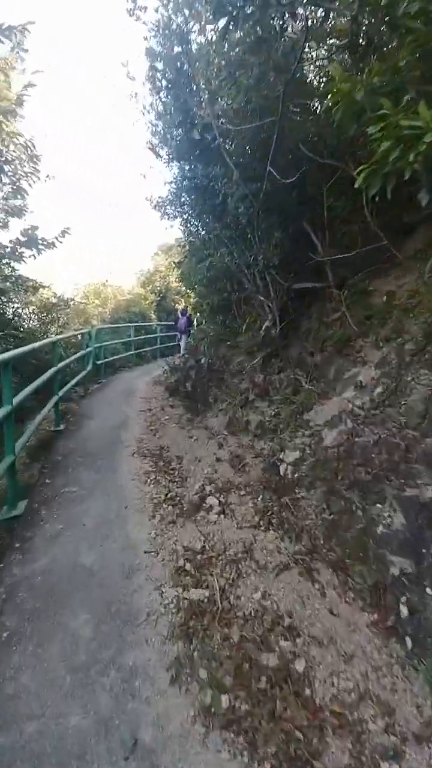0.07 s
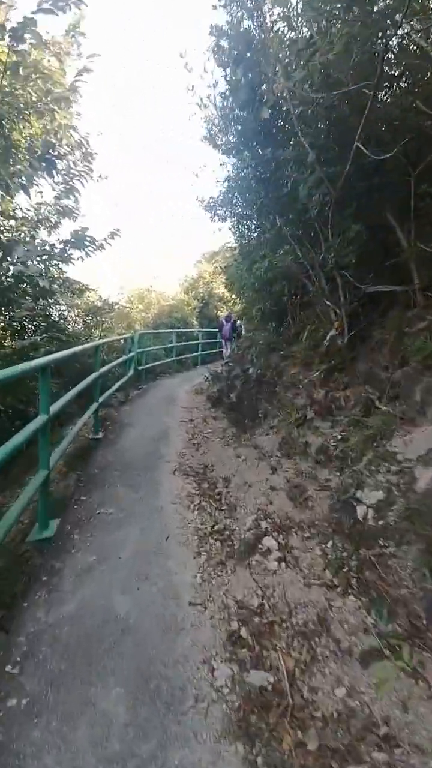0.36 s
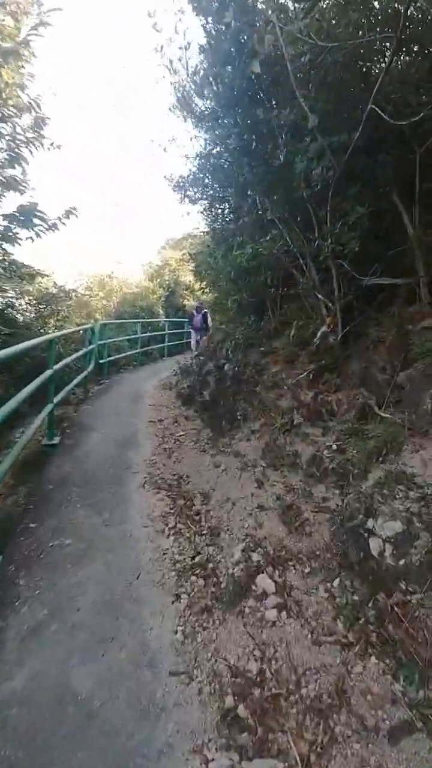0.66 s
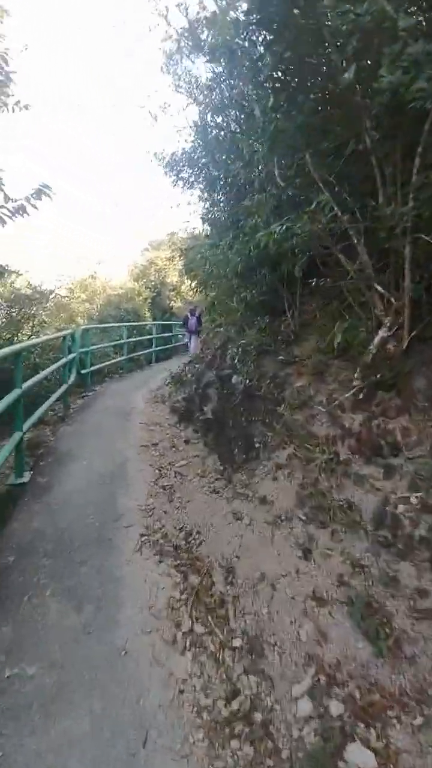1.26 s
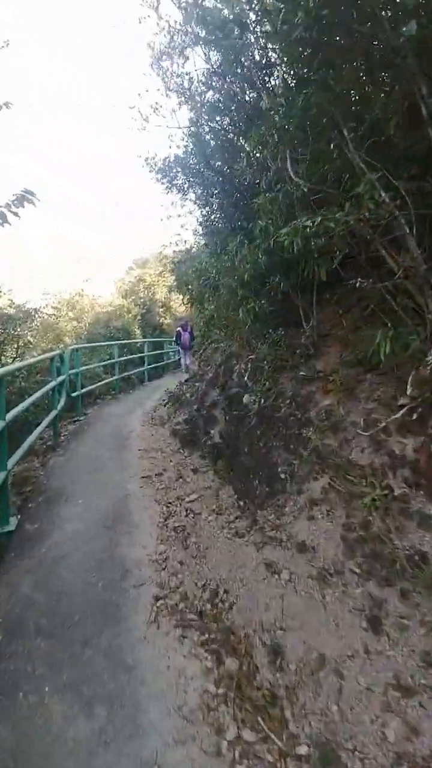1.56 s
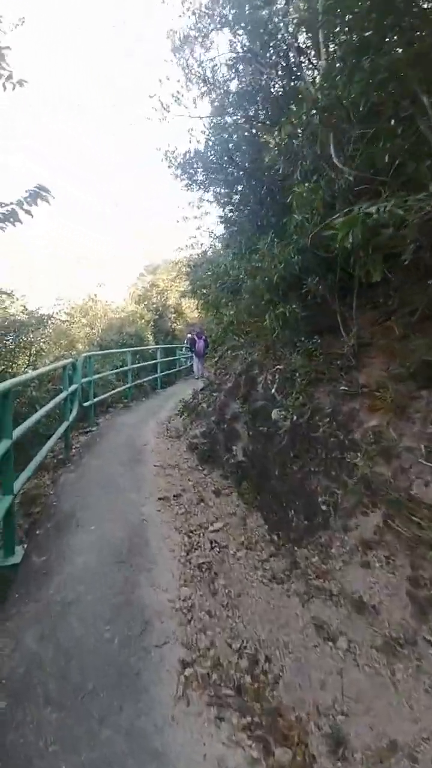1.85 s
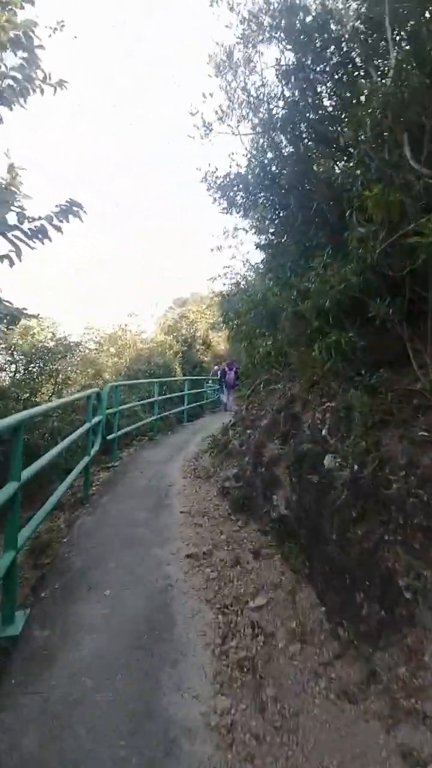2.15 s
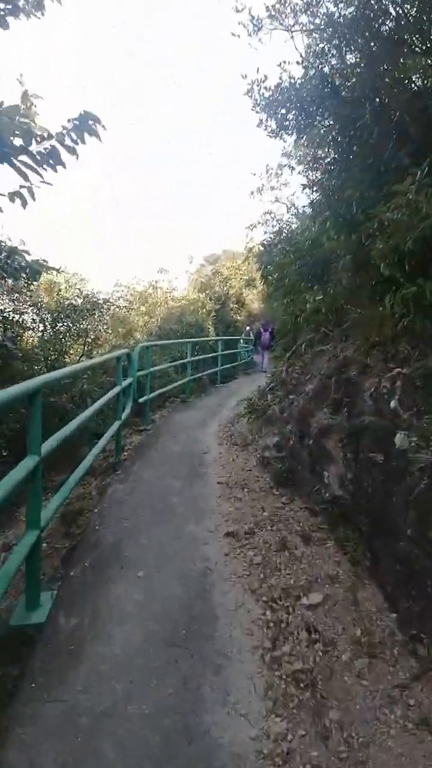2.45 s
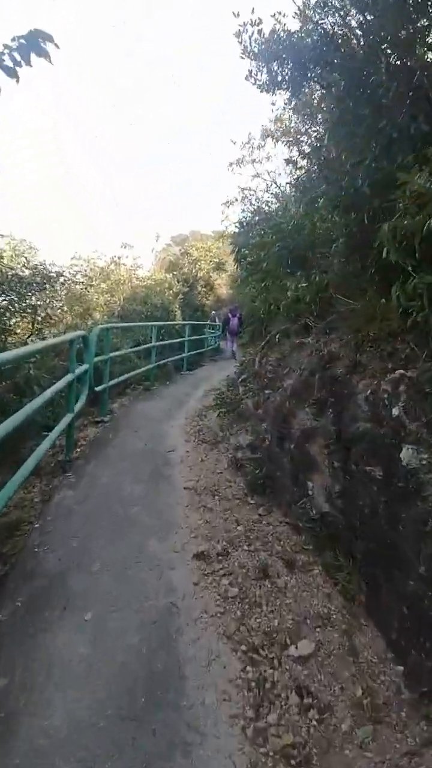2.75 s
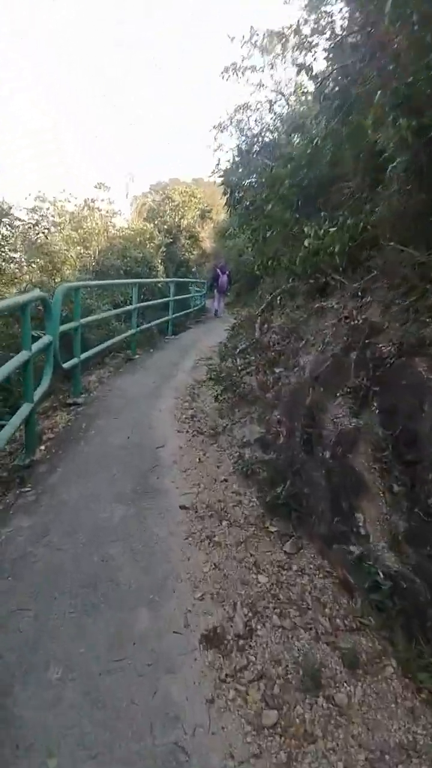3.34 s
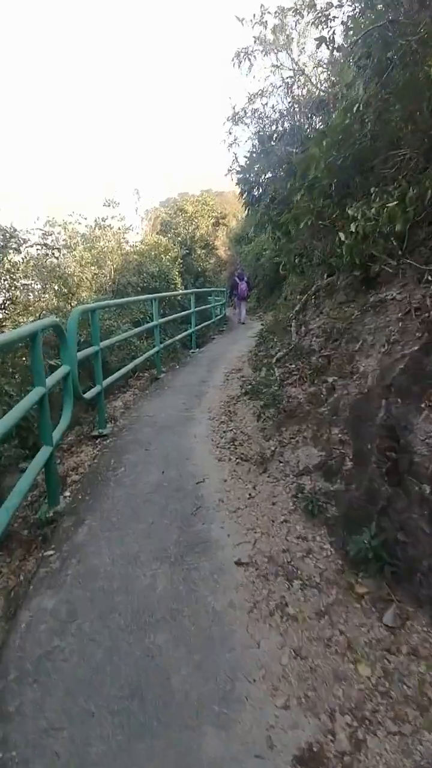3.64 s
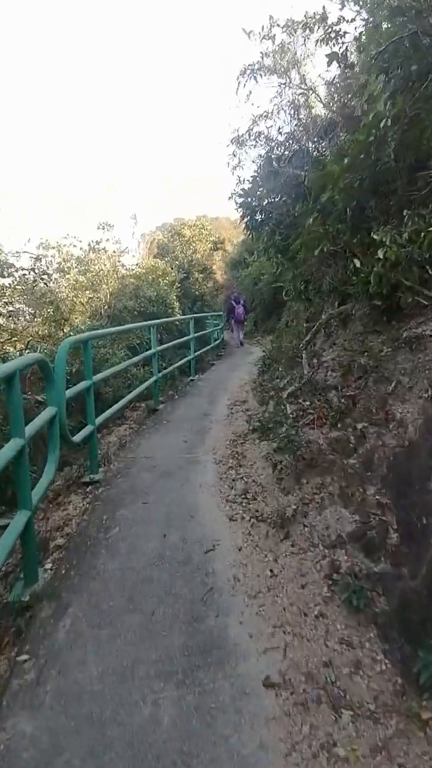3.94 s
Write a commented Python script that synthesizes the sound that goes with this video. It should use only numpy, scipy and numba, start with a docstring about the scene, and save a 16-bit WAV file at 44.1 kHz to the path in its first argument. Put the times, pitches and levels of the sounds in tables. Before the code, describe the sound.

Wind rumbles on the microphone in uneven gusts along a hillside path, growing stronger halfway through. Carried gear clicks and ticks close by, mostly on the right, and leaves hiss faintly, with soft shoe scuffs near the end.

```python
"""Paved hillside path, on a walk. Gusts buffet the left and right microphone ports in turn.
Carried gear knocks, rattles and ticks close by, mostly on the right: a plastic body and small
hard parts ring briefly. Soles scuff softly on grit; something rubs with one faint squeak.
Open air and hissing foliage lie all round."""
import sys
import numpy as np
from scipy import signal
from scipy.fft import rfft, irfft
from scipy.io import wavfile
from numba import njit

SR = 44100
rng = np.random.default_rng(int(sys.argv[2]) if len(sys.argv) > 2 else 0)


def materialize(psi):
    """Save the field psi as 16-bit PCM at rate SR to the path in sys.argv[1].

    A 1-D psi becomes a single channel; in a 2-D psi each row is a channel.
    """
    bounded = np.clip(np.atleast_2d(psi).T, -1, 1)
    quanta = np.round(bounded * 32767).astype(np.int16)
    wavfile.write(sys.argv[1], SR, quanta)


N = 176400
T = np.arange(N) / SR
RUB_ATTACK_S, RUB_RELEASE_S = .0055, .0047


def amp(db):
    """Decibels to gain."""
    return 10 ** (np.asarray(db) / 20)


def unit(x):
    """Scale to rms 1."""
    return x / np.sqrt(np.mean(x ** 2) + 1e-18)


def noise(spectrum, white=None):
    """Noise of rms 1, shaped by (f/Hz, level/dB) points."""
    hz, db = np.array(spectrum).T
    f = np.maximum(np.arange(N // 2 + 1) * SR / N, 1)
    white = rng.standard_normal(N) if white is None else white
    gain = amp(np.interp(np.log(f), np.log(hz), db))
    return unit(irfft(rfft(white) * gain, N))


def wander(rate_hz):
    """Smooth random signal of rms 1, bandwidth about rate_hz."""
    f = np.arange(N // 2 + 1) * SR / N
    return unit(irfft(rfft(rng.standard_normal(N)) * np.exp(-(f / rate_hz) ** 2), N))


def swell(start_s, length_s, attack_s, release_s):
    """Envelope: exponential rise up to start_s, hold, decay."""
    rise = np.minimum(T - start_s, 0) / attack_s
    fall = np.maximum(T - start_s - length_s, 0) / release_s
    return np.exp(np.maximum(rise - fall, -20))


def pan(db):
    """Constant-power gains for an L-R level difference."""
    gains = amp([[db / 2], [-db / 2]])
    return gains / np.sqrt(np.sum(gains ** 2))


def ports(x, lag_s=.00054):
    """Sound from the right reaches the left port late."""
    return np.array([np.roll(x, int(lag_s * SR)), x])


def ring(t, hz, t60_s, rise_s):
    """One struck mode."""
    return np.sin(2 * np.pi * hz * t) * np.exp(-np.log(1000) * t / t60_s) * (1 - np.exp(-t / rise_s))


@njit
def lowpass(x, hz):
    """Two-pole low-pass with a moving corner."""
    y, band_state, low_state = np.empty(len(x)), 0., 0.
    for i in range(len(x)):
        g = np.tan(np.pi * hz[i] / SR)
        band = (band_state + g * (x[i] - low_state)) / (1 + g * (g + 1.3))
        y[i] = low_state + g * band
        band_state, low_state = 2 * band - band_state, 2 * y[i] - low_state
    return y


def buffet(gusts, spectrum, breeze_db, breeze_hz):
    """Turbulence on one port: eddies shake each gust; a stronger push reaches higher."""
    wake_db, wake_s, wake_hz = -17, .22, 147  # broader, deeper swell round each gust
    eddy_db, reach_exponent = 2.5, .33
    power = np.full(N, amp(breeze_db) ** 2)
    weighted_hz = power * breeze_hz
    for start_s, length_s, db, reach_hz in gusts:
        env = swell(start_s, length_s, attack_s=.012, release_s=.024)
        push = (amp(db) * env) ** 2
        wake = (amp(db + wake_db) * swell(start_s, length_s, wake_s, wake_s)) ** 2
        power += push + wake
        weighted_hz += push * reach_hz * env ** reach_exponent + wake * wake_hz
    eddies = amp(eddy_db * wander(rate_hz=72.5))
    corner_hz = np.clip(weighted_hz / power * eddies ** reach_exponent, 40, 3000)
    rumble = noise(spectrum)
    for _ in range(3):
        rumble = lowpass(rumble, corner_hz)
    return rumble * np.sqrt(power) * unit(eddies)


def wind():
    """Each port rumbles with its own gusts over a steady breeze."""
    # gusts: t/s, length/s, relative level/dB, upper reach/Hz
    gusts_left = [(0, 0.22, -34, 207), (.46, 0.29, -38, 174), (1.03, 0.084, -38, 205),
                  (1.37, 0.042, -30, 230), (1.54, 0.28, -33, 206), (1.89, 0.24, -28, 284),
                  (2.08, 0.035, -21, 398), (2.123, 0.0087, -21, 510), (2.19, 0.062, -26, 366),
                  (2.35, 0.074, -25, 316), (2.522, 0.008, -21, 400), (2.544, 0.0054, -20.5, 600),
                  (2.565, 0.038, -30, 300), (2.645, 0.037, -20.5, 492), (2.7, 0.028, -22.5, 322),
                  (2.758, 0.0074, -20.5, 370), (2.795, .012, -20, 262), (2.85, .02, -21.5, 334),
                  (2.895, 0.028, -26.5, 348), (3.0, 0.049, -28, 282), (3.085, 0.017, -22, 229),
                  (3.19, 0.038, -28.5, 312), (3.275, 0.024, -23, 510), (3.63, 0.054, -33.5, 222),
                  (3.74, 0.096, -33, 233)]
    gusts_right = [(0.071, 0.014, -27, 235), (.12, 0.037, -30.5, 446), (.18, 0.06, -27.5, 270),
                   (.26, 0.1, -31, 277), (.48, 0.053, -29, 318), (.64, 0.018, -27, 302),
                   (.76, 0.066, -31.5, 282), (.95, 0.061, -35.5, 250), (1.145, 0.056, -32, 303),
                   (1.216, 0.01, -22.5, 453), (1.245, 0.033, -26.5, 577), (1.285, 0.012, -24, 244),
                   (1.31, 0.056, -30, 300), (1.55, 0.22, -38.5, 191), (2.31, 0.24, -32.5, 215),
                   (2.52, 0.15, -31.5, 313), (2.619, 0.13, -29, 332), (2.856, 0.025, -28.5, 308),
                   (2.935, 0.041, -26, 493), (3.039, 0.079, -26.5, 202), (3.209, 0.011, -30.5, 754),
                   (3.26, 0.037, -31, 447), (3.328, 0.041, -21.5, 620), (3.368, 0.032, -25.5, 1030),
                   (3.41, 0.05, -36, 530), (3.695, 0.0055, -22, 327), (3.725, 0.071, -30, 530),
                   (3.829, 0.049, -23, 335), (3.963, 0.049, -25.5, 262)]
    # turbulence spectra ahead of the low-pass: f/Hz, relative level/dB
    spectrum_left = [(15, -28), (35, 2.5), (70, 2.5), (140, 3.5), (250, -2.5), (450, -7), (900, -5),
                     (3000, -18)]
    spectrum_right = [(15, -22), (35, 1.5), (70, 4.5), (150, -0.5), (250, -1.5), (380, -3.5), (480, -3.5),
                      (650, -10), (1000, -10), (3000, -16.5)]
    left = amp(5) * buffet(gusts_left, spectrum_left, breeze_db=-49, breeze_hz=150)
    right = amp(6) * buffet(gusts_right, spectrum_right, breeze_db=-45, breeze_hz=160)
    return np.array([left, right])


def knocks():
    """Gear strikes a hard plastic body: its modes ring, loose parts leave a faint rattle."""
    # knocks: t/s, relative level/dB, favoured f/Hz, factor on ring time and rattle gain, L-R/dB
    hits = [(0.0176, -26, 2250, 0.92, -8), (0.0209, -32, 6900, 1, -9), (.1003, -32.5, 10000, 0.51, -9),
            (0.711, -27.5, 2400, 0.36, -10), (1.126, -38, 2400, 0.95, -13), (1.139, -34, 14000, 0.63, -15),
            (1.628, -43.5, 1600, 0.76, -12), (1.778, -45, 1600, 0.89, 8), (2.6354, -26, 7900, 0.62, -9),
            (2.6387, -25.5, 6800, 1.3, -22), (2.6405, -26, 3840, 0.98, -10),
            (2.6688, -26.5, 4760, 0.75, -10), (2.683, -34, 14000, .8, -4), (2.7976, -25.5, 4950, 0.58, -7),
            (2.854, -36.5, 2570, .5, -8), (3.2802, -31.5, 7000, 0.87, -12), (3.294, -26, 1800, 0.97, -10)]
    # body modes: f/Hz, relative level/dB, base t60/s
    modes = [(475, -2, 0.011), (1610, -1, 0.0086), (3240, -1, 0.0074), (4184, -9, .015), (5600, -1, 0.008),
             (6910, 0.5, 0.012), (7920, -3.5, 0.0048), (9260, -8.5, 0.0046), (14600, -6, 0.0039)]
    # rattle spectrum: f/Hz, relative level/dB
    rattle_spectrum = [(500, -3), (1700, 1), (2400, -5.5), (3400, 0.5), (4600, -2.5), (6900, 10),
                       (8300, -4), (9500, -15), (15500, -14)]
    favour_db, favour_octaves = 11.5, .49  # the contact point brings out modes near one frequency
    rattle_db, rattle_t60_s = -14, .11
    out, size = np.zeros((2, N)), SR // 5
    t = T[:size]
    rattle = np.array([noise(rattle_spectrum), noise(rattle_spectrum)])
    fade = amp(rattle_db) * np.exp(-np.log(1000) * t / rattle_t60_s)
    detunes = 1 + .012 * rng.standard_normal((len(hits), len(modes)))
    for (start_s, db, favoured_hz, ring_factor, pan_db), mode_detunes in zip(hits, detunes):
        i, body = int(start_s * SR), 0
        for (hz, mode_db, t60_s), detune in zip(modes, mode_detunes):
            boost_db = favour_db * np.exp(-(np.log2(hz / favoured_hz) / favour_octaves) ** 2)
            body += amp(mode_db + boost_db) * ring(t, hz * detune, t60_s * ring_factor, rise_s=.00029)
        tail = ring_factor * fade * rattle[:, i:i + size]
        out[:, i:i + size] += amp(db) * pan(pan_db) * (ports(body) + tail)
    return out


def ticks():
    """Small hard parts touch: a high, brief ring; a shorter overtone adds snap."""
    # contacts: t/s, relative level/dB, f/Hz, t60/s, L-R/dB
    contacts = [(0.5295, -30, 5650, 0.0093, -3), (.529, -25, 7650, .003, 0), (.586, -35, 9100, .001, -13),
                (1.9072, -20, 8500, 0.0037, 25), (2.0893, -25, 3780, 0.003, 16),
                (2.7985, -31, 4180, .024, -1), (3.099, -17, 6540, 0.015, -27),
                (3.0994, -24.5, 4030, .004, -6), (3.1271, -12, 6630, 0.011, -23),
                (3.2485, -19, 6600, 0.0056, -12.5)]
    overtone_ratio, overtone_db, rise_s = 1.65, -11.5, .0001
    out, size = np.zeros((2, N)), SR // 5
    t = T[:size]
    for start_s, db, hz, t60_s, pan_db in contacts:
        i = int(start_s * SR)
        overtone = amp(overtone_db) * ring(t, hz * overtone_ratio, t60_s=.0016, rise_s=rise_s)
        # small parts radiate little below their ring frequency
        highpass = signal.butter(2, .75 * hz, "high", fs=SR, output="sos")
        tick = signal.sosfilt(highpass, ring(t, hz, t60_s, rise_s) + overtone)
        out[:, i:i + size] += amp(db) * pan(pan_db) * ports(tick)
    return out


def footsteps():
    """Soles drag briefly over grit."""
    # scuffs: t/s, length/s, relative level/dB
    scuffs = [(3.293, 0.027, -42.5), (3.366, 0.011, -53), (3.744, 0.005, -50), (3.873, 0.055, -49.5)]
    # grit spectrum: f/Hz, relative level/dB
    grit = [(300, -50), (800, 3), (1500, 3.5), (2200, 3.5), (3200, 6), (4300, -16), (6500, -5), (9000, -14),
            (15000, -33)]
    grain_db = 3.5
    env = sum(amp(db) * swell(start_s, length_s, RUB_ATTACK_S, RUB_RELEASE_S)
              for start_s, length_s, db in scuffs)
    grains = unit(amp(grain_db * wander(rate_hz=200)))
    return pan(db=-8) * ports(env * grains * noise(grit))


def squeak():
    """Something rubs: a thin, hoarse tone, mostly on the left."""
    start_s, length_s, level_db, pitch_hz = 3.1, .17, -57, 1760
    rub = wander(rate_hz=110) * np.sin(2 * np.pi * pitch_hz * T)
    return pan(db=7) * amp(level_db) * swell(start_s, length_s, RUB_ATTACK_S, RUB_RELEASE_S) * rub


def wash(spectra, levels):
    """Wide, lightly fluttering noise whose level changes along the path."""
    depth_db, shared_power = 1.68, .1
    times_s, *sides_db = np.array(levels).T
    flutter_db = depth_db * wander(rate_hz=8.7)
    common = np.sqrt(shared_power) * ports(rng.standard_normal(N))
    whites = common + np.sqrt(1 - shared_power) * rng.standard_normal((2, N))
    return np.array([noise(spectrum, white) * amp(np.interp(T, times_s, db) + flutter_db)
                     for spectrum, white, db in zip(spectra, whites, sides_db)])


def air():
    """Open air: a soft, low wash."""
    # air spectra: f/Hz, relative level/dB
    left = [(60, 16), (300, 6), (500, 1.5), (800, -2.5), (1200, -4.5), (1800, -9.5), (2400, -8),
            (3100, -6.5), (3900, -18.5), (8000, -31)]
    right = [(60, 4), (300, 9.5), (500, 12.5), (800, 5.5), (1200, -0.5), (1700, -3), (2400, -8),
             (3200, -3.5), (4000, -22), (8000, -32)]
    # air envelope: t/s, left level/dB, right level/dB
    levels = [(0, -50, -50.5), (.35, -49.5, -50), (.7, -47.5, -48.5), (1.3, -50.5, -50), (1.8, -47, -50),
              (2.2, -50, -54), (2.9, -51, -55), (3.3, -44, -52), (3.6, -49, -53), (4, -45.5, -50.5)]
    return wash((left, right), levels)


def leaves():
    """Foliage hisses, louder towards the end."""
    # hiss spectra: f/Hz, relative level/dB
    left = [(1500, -51), (3200, -18), (4100, -1.5), (5200, 6.5), (6500, 6), (8200, 3.5), (9500, -4.5),
            (12000, -10), (15500, -12.5)]
    right = [(1500, -16), (3200, -8), (4100, -14), (5400, -5), (6100, -4), (6850, 0), (7800, -12.5),
             (9500, -18.5), (13000, -22), (15300, -21)]
    # hiss envelope: t/s, left level/dB, right level/dB
    levels = [(0, -67, -58), (.35, -67, -56), (.65, -69, -56), (.8, -65.5, -58), (1.3, -67, -57),
              (1.7, -64.5, -55), (2.05, -61.5, -56), (2.5, -65.5, -56.5), (2.9, -59.5, -55.5),
              (3.35, -56.5, -52.5), (3.6, -52, -53), (3.8, -56.5, -53), (4, -57, -53.5)]
    return wash((left, right), levels)


def scene():
    """Wind, gear, steps and squeak over air and leaves."""
    rumble = wind()
    background = air() + leaves()
    return rumble + knocks() + ticks() + footsteps() + squeak() + background


def record(dry):
    """The hand-held camera cuts the top treble."""
    cutoff_hz = 15900
    return signal.sosfilt(signal.ellip(8, .2, 70, cutoff_hz, fs=SR, output="sos"), dry)


dry = scene()
out = record(dry)
materialize(out)
```